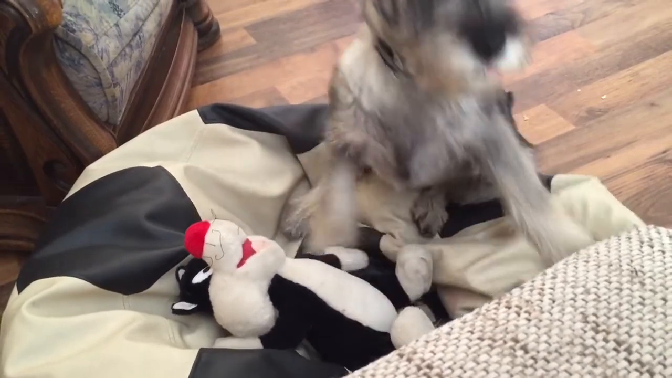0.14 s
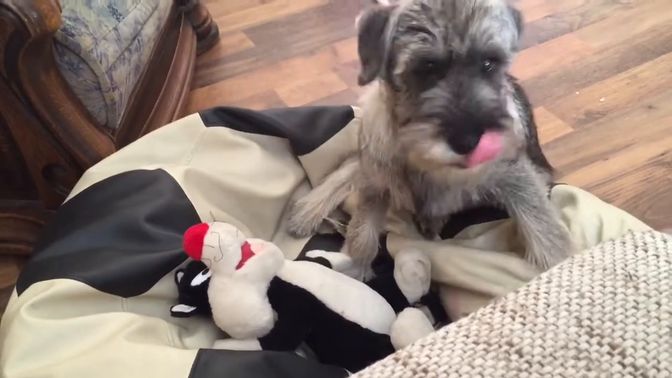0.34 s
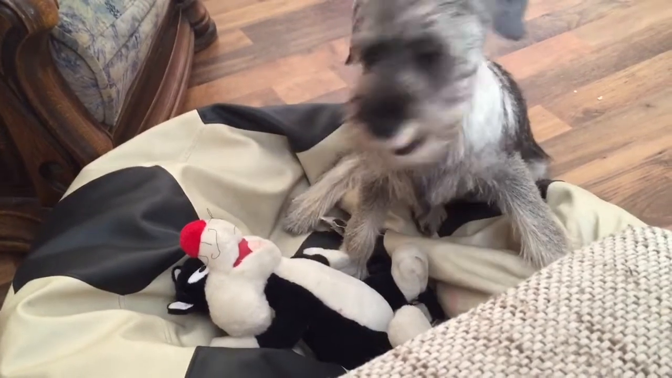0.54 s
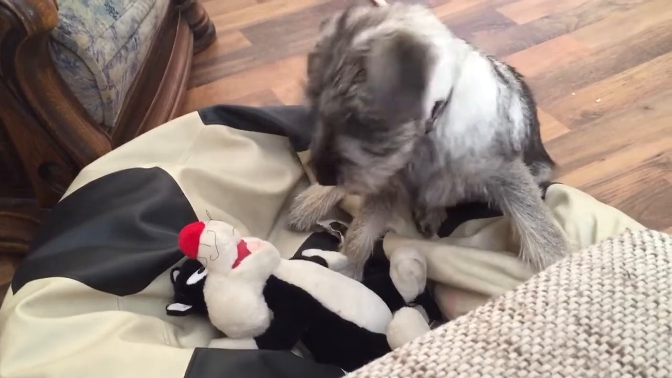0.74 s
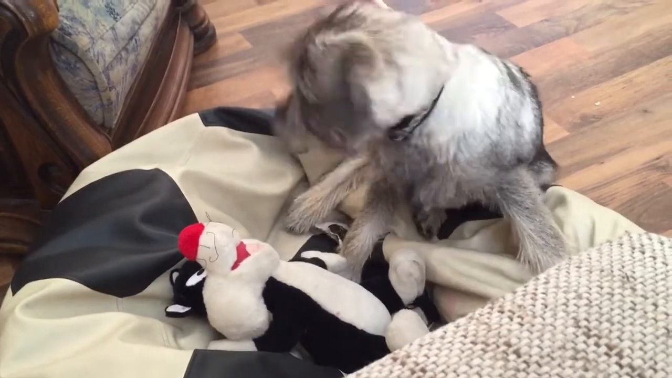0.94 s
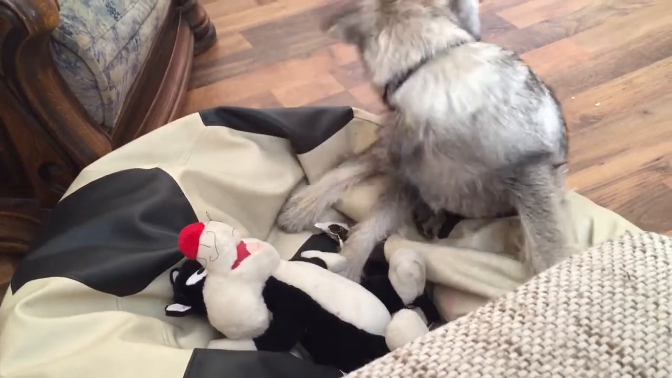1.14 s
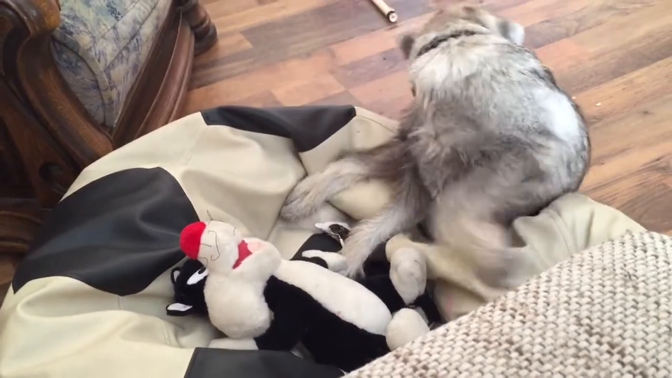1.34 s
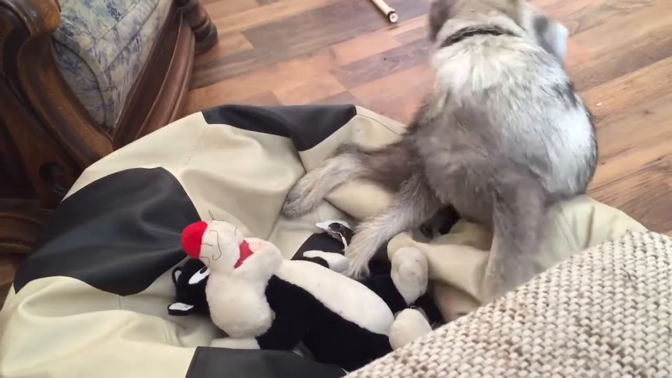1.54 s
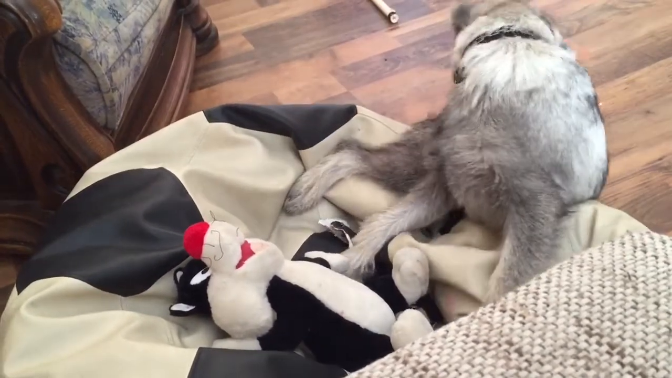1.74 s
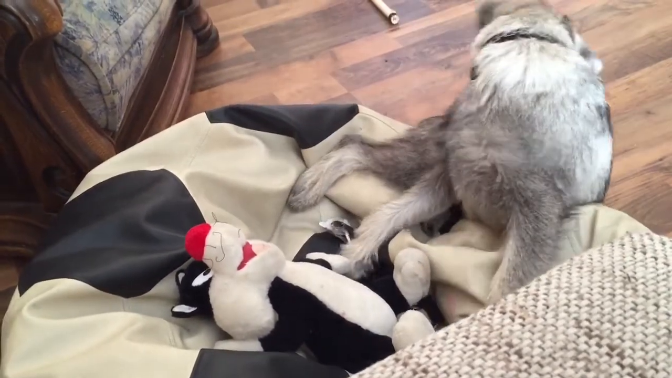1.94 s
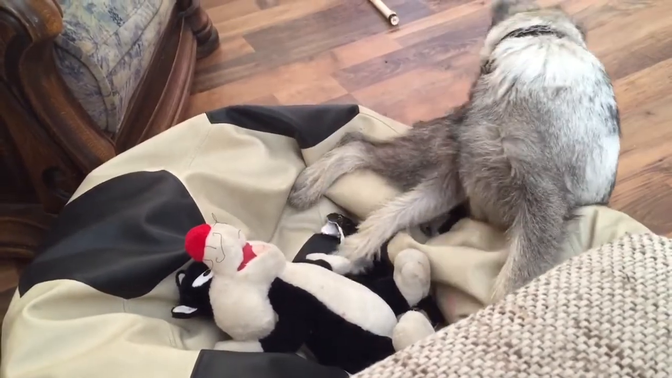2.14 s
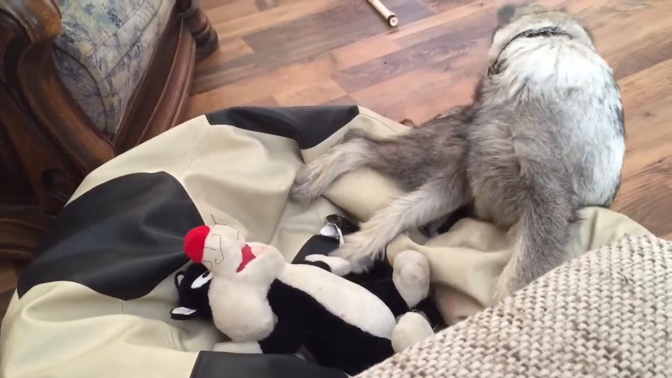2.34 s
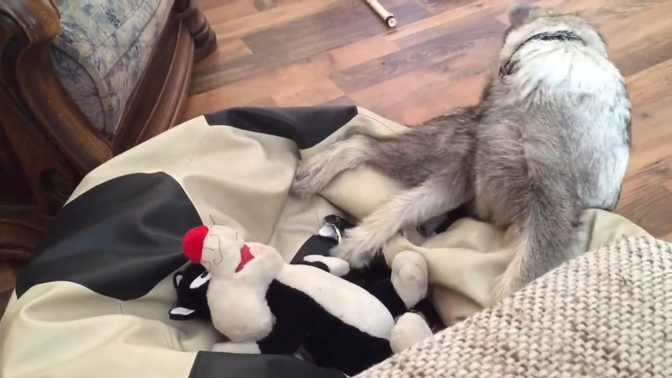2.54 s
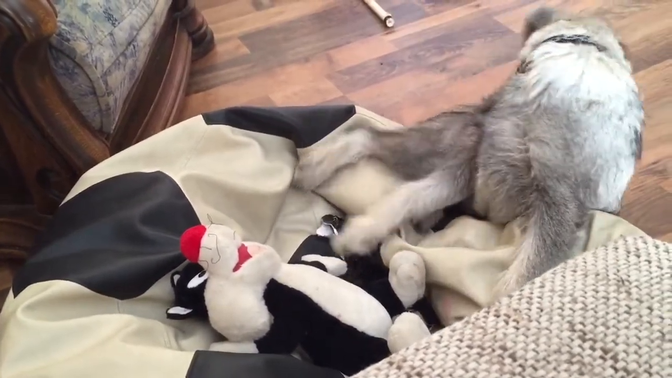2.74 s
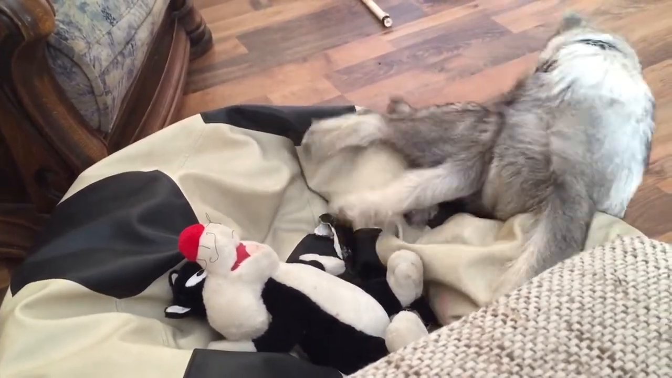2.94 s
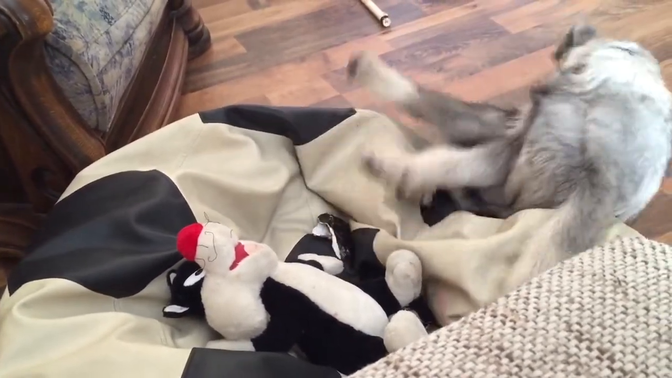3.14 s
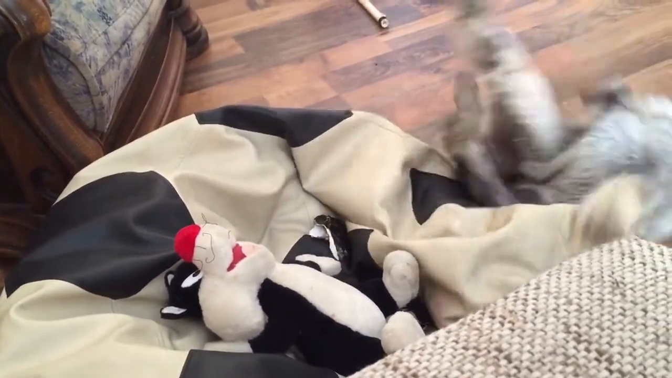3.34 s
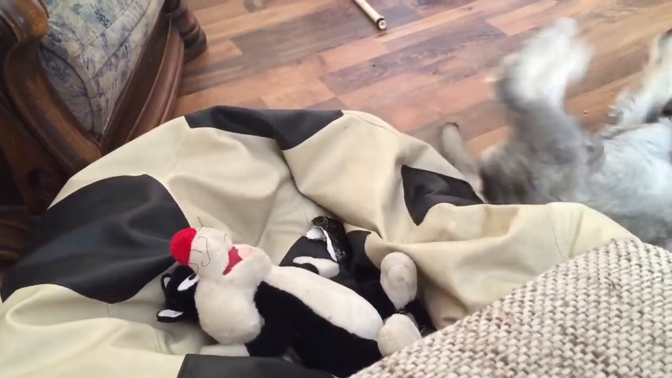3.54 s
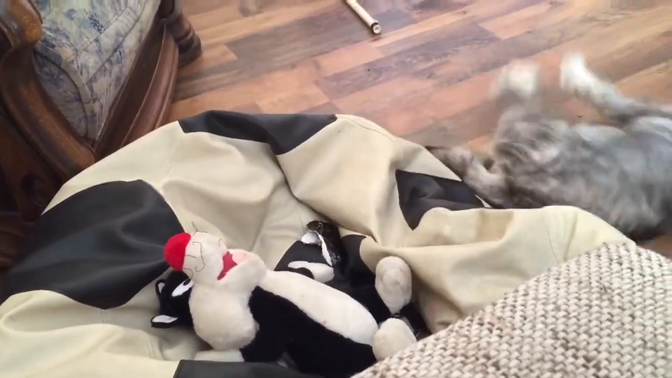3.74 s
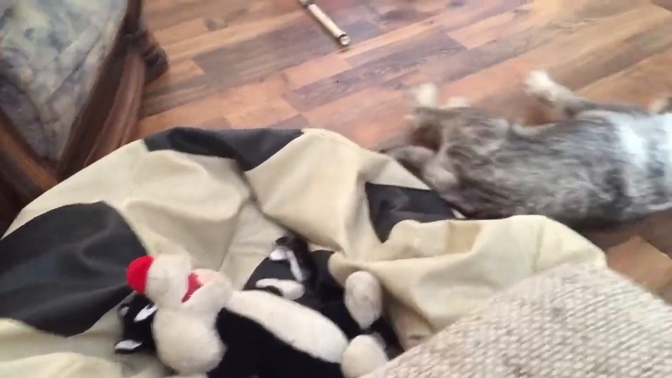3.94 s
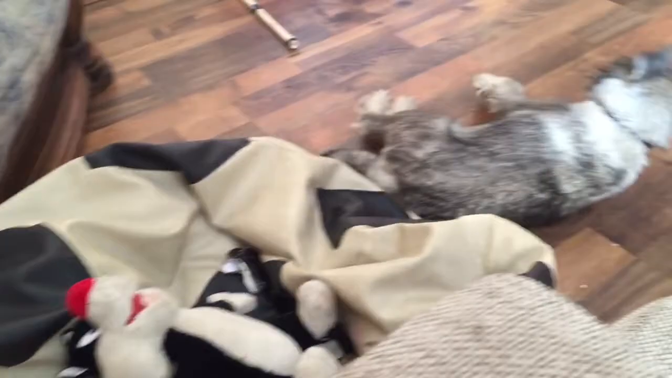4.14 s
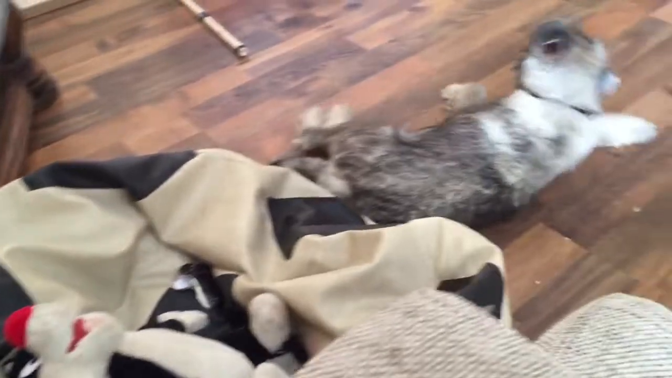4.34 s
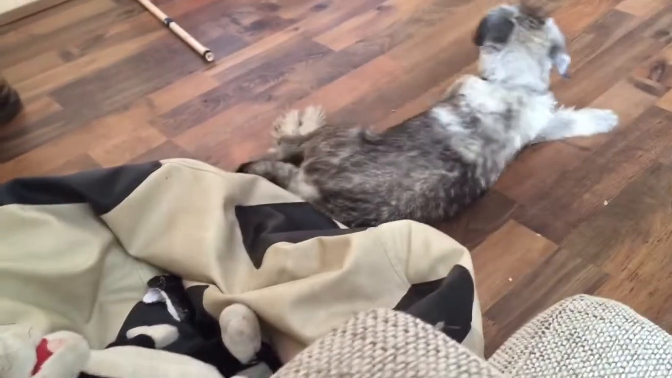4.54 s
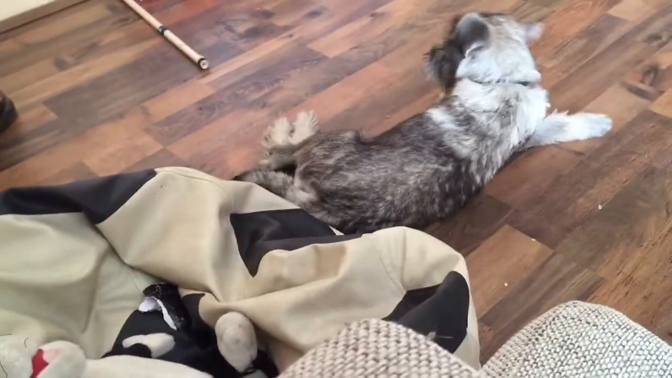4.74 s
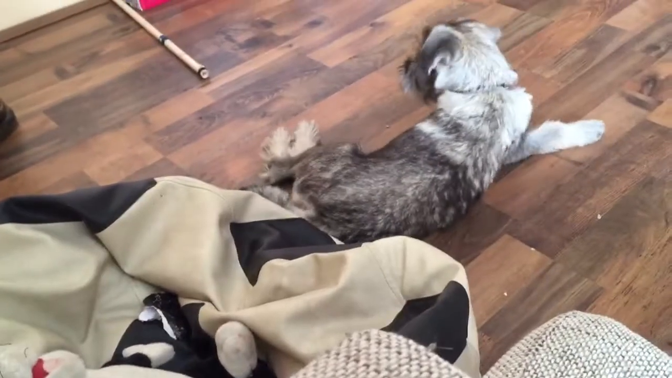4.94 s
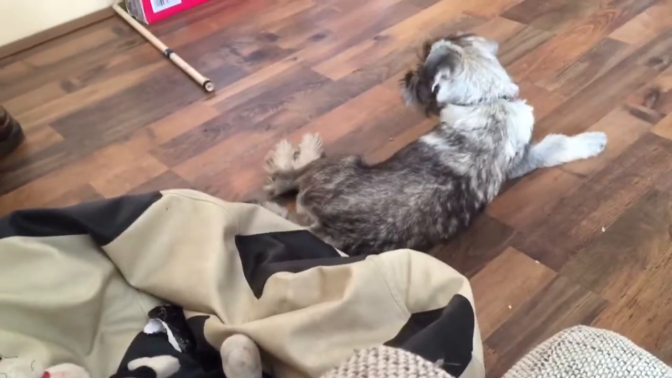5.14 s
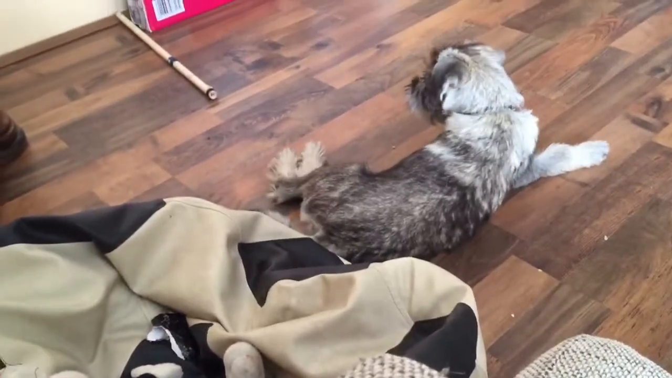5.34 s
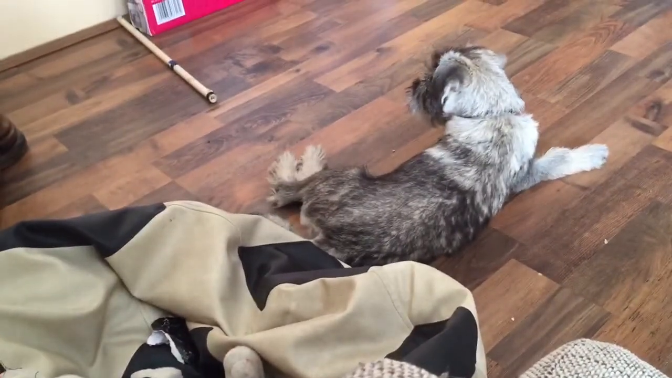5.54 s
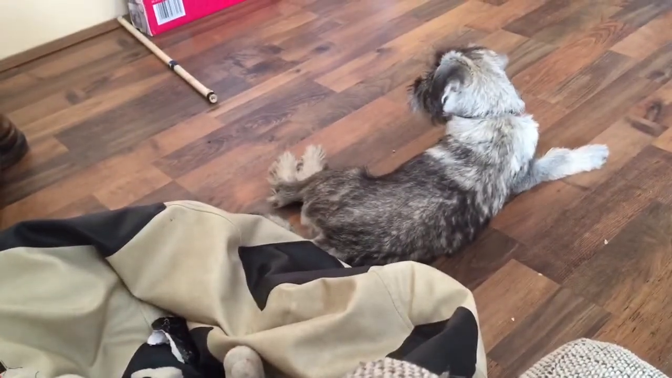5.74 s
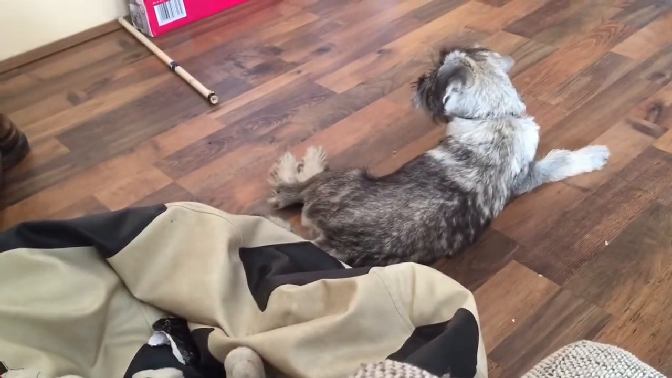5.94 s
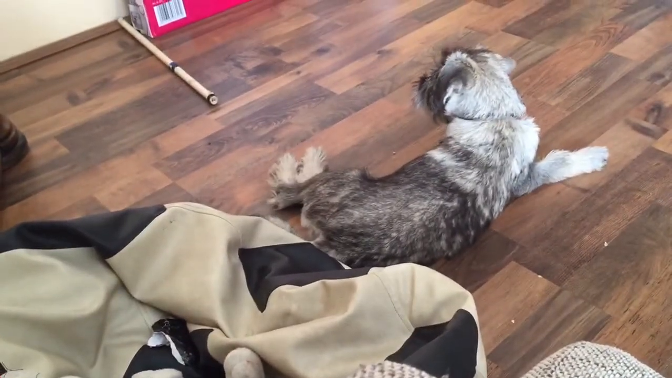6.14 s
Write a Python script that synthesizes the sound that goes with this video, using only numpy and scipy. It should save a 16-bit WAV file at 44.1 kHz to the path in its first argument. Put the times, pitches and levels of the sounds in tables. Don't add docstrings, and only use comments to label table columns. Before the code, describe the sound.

In a quiet living room, a small dog scrambles on a bean bag close to a small microphone. Two or three sharp stamps crunch the beads and slap the cover, then softer rustles and fur hiss follow, with one more strong stamp. It slides off and hits the wooden floor with two hollow knocks, the second louder. Collar tag ticks, a few beads trickle, then only faint room air and fridge hum remain.

```python
import sys
import numpy as np
from scipy import signal
from scipy.io import wavfile

SR = 44100
rng = np.random.default_rng(int(sys.argv[2]) if len(sys.argv) > 2 else 0)


def wav_record(signal):
    frames = np.transpose(np.atleast_2d(signal))
    bounded = np.clip(frames, -1, 1)
    quanta = np.round(bounded * 32767).astype(np.int16)
    wavfile.write(sys.argv[1], SR, quanta)


def gain_from_db(level_db):
    decades = np.asarray(level_db, float) / 20
    return 10 ** decades


N = 273331

# pitch_hz, width_hz, level_db
BAG_RESONANCES = [(105.5, 39, -6), (206, 40.7, -3), (286, 30, 1), (362, 32.7, 1), (444.6, 37, -1.5)]
# pitch_hz, level_db (per Hz)
CRUNCH_COLOUR = [(900, 2), (1200, -1), (1800, 1), (2800, -6.5), (3700, -12), (6000, -22), (12000, -33),
                 (16500, -51.5)]
# pitch_hz, level_db (per Hz)
HISS_COLOUR = [(2500, 0.5), (4000, -1.5), (6500, -5.5), (9000, -9.5), (10800, -14.5), (12500, -11.5),
               (15000, -12.5), (16500, -11)]
# pitch_hz, level_db (per Hz)
DRAG_COLOUR = [(380, -9.5), (460, -3.5), (700, 3), (1000, -4), (1300, -10.5)]
# start_s, push_db, crunch_db (re push), hiss_db (re push), weight_db
STAMPS = [(0.222, -39.5, -3, -32, -43), (0.233, -31.5, -9, -16, -42), (0.317, -36, -8.5, -4, -40.5),
          (0.35, -37.5, -13, -20, -65), (1.035, -60.5, -6, -14.5, -60), (1.207, -55, -14, -27, -55.5),
          (1.631, -30.5, -10, -14.5, -36), (2.071, -65, -23, -15, -71), (2.375, -65.5, -3, 0.5, -63),
          (2.597, -60, -2, -19, -60), (2.861, -45, -10, -19, -73), (3.065, -47, -7.5, -25, -70)]
# pitch_hz, level_db, t60_s
WEIGHT_MODES = [(60, -20, 0.35), (94, -10, 0.21), (133.4, -8, 0.29), (202.8, 0, 0.22)]
# full_s, hold_s, crunch_db, climb_s (last 20 dB), depth_db (bag body re crunch)
LEANS = [(0.0, 0.024, -56, .05, 1), (0.056, .15, -62.5, -1.3, 4), (0.361, 0.036, -56, 0.3, 9.5),
         (0.453, 0.046, -59, 0.5, 3.5), (0.546, 0.058, -62, .1, 4), (0.798, 0.031, -58.5, 0.12, 1.5),
         (0.853, 0.056, -63, -0.45, 2.5), (1.267, 0.15, -64.5, .1, 7.5), (1.378, .12, -54, 0.15, -6),
         (1.697, 0.026, -65, 1, 1), (2.052, 0.011, -66, 0.24, 8.5), (2.393, 0.025, -70.5, 0.7, -2),
         (2.607, 0.017, -67.5, 0.13, 2), (2.875, 0.085, -57, 0.16, -3.5), (3.268, 0.062, -55, 0.37, -2.5),
         (3.405, 0.12, -53, 0.24, -3.5), (3.744, 0.058, -56, 0.11, 6), (3.856, 0.051, -66, 0.56, 14.5),
         (4.22, 0.24, -82.5, -7, 5)]
# full_s, hold_s, hiss_db, climb_s (last 20 dB), drag_db (re hiss)
RUBS = [(.01, 0.032, -70, 4.5, 3.5), (.36, .04, -62, -0.06, -10), (.45, 0.05, -68, 0.5, 7),
        (0.77, 0.15, -75, 0.19, 14.5), (1.505, .01, -68, 0.5, 3), (2.095, .03, -76, 1.8, -1.5),
        (2.23, .02, -76, .1, 5.5), (2.40, .01, -73.5, -0.4, -6), (2.603, 0.0092, -74, .1, -3),
        (2.873, 0.041, -63, 0.11, -3), (3.114, .01, -75, 1.2, -4), (3.426, 0.022, -68.5, 0.28, 9.5),
        (3.713, 0.037, -74.5, 0.5, 8), (3.944, 0.019, -71.5, 1.4, 14.5), (4.2, 0.28, -79.5, 1.3, -2.5)]
# full_s, hold_s, level_db, climb_s (last 20 dB)
FIDGET = (0.0, 4, -74, .1)
# full_s, hold_s, level_db, climb_s (last 20 dB)
TRICKLE = (3.6, 1.0, -82, .9)
# start_s, level_db (rms), low_hz, high_hz, length_s
SNAPS = [(0.2245, -44, 300, 3000, .005), (0.2385, -47, 2500, 7000, .007), (0.3213, -40, 800, 3000, .003),
         (0.3215, -47, 3000, 15000, .004), (0.578, -68, 4000, 13000, .004), (2.09, -74, 5000, 10000, .03),
         (.443, -67, 12000, 15300, .014), (.477, -66, 11000, 15300, .012), (3.548, -56, 2400, 4900, .03),
         (3.9022, -57, 2800, 9500, .004), (3.549, -66, 4900, 8500, .008), (3.95, -65, 2500, 6200, .022),
         (3.985, -70, 3400, 4500, .03), (4.39, -75, 3000, 15000, .022)]
# start_s, peak_db, pitch_hz, width_hz
SLAPS = [
    (0.2335, -31, 230, 160),
    (0.3218, -29, 520, 600),
]
# start_s, peak_db, knock_hz, width_hz, crack_db (rms)
LANDINGS = [
    (3.509, -42, 750, 500, -70),
    (3.5213, -21.5, 720, 340, -56),
    (3.7153, -17.8, 770, 170, -40),
]
# pitch_hz, level_db, t60_s
HIP_MODES = [(93.6, -39.5, 0.16), (124.1, -35.5, 0.13), (165.2, -39.5, 0.257), (212.6, -34, 0.31),
             (308, -37, 0.1), (403, -39, 0.11), (647, -45, 0.332)]
# pitch_hz, level_db, t60_s
SHOULDER_MODES = [(215, -41, .35), (312, -41, .2), (533, -44, .45), (565, -44, .45), (655, -40, .55),
                  (684, -38, .55), (781, -43, .35), (948, -41, .36), (1095, -42, .32), (1250, -47, .35),
                  (1690, -47, .33), (2400, -50, .45), (1450, -51, .25), (3200, -51, .28)]
# delay_s, level_db
ECHOES = [(.0092, 1), (.0163, -7), (.033, -5), (.049, -4), (.059, -7)]
# full_s, hold_s, level_db, climb_s (last 20 dB)
SWAYS = [
    (3.51, .15, -54, -0.57),
    (3.87, 0.037, -56.5, 0.07),
]
# start_s, peak_db, ring_hz (main ring)
TAG_TICKS = [(3.6132, -56, 3630), (3.902, -49, 3180), (3.9062, -43, 4220), (3.914, -48, 3220),
             (3.9542, -43, 3960), (3.958, -46, 4070), (3.962, -48, 3770)]
# ratio (multiple of main ring), level_db, t60_s
TAG_MODES = [(1.0, -4, .022), (1.06, -8, .018), (1.36, -14, .012), (.78, -12, .014)]
# pitch_hz, level_db (rms)
HUM = [(96.8, -77), (198.6, -78), (173, -86), (294, -91.5)]
# pitch_hz, level_db (per Hz)
AIR_COLOUR = [(20, -33), (45, -4.5), (200, -6.5), (400, -15.5), (1000, -18.5), (4000, -24), (10000, -28),
              (16500, -33.5)]
# pitch_hz, t60_s
ROOM_T60 = [(100, 0.12), (600, 0.6), (2000, 0.15), (6000, 0.25), (14000, 0.1514)]

LEAN_RELEASE_DB_PER_S, RUB_RELEASE_DB_PER_S, FIDGET_FADE_DB_PER_S = 170.5, 195, 35
DRAG_RE_CRUNCH_DB, DRAG_SHARE_OF_DEPTH = -4, 0.45
FIDGET_BODY_DB, FIDGET_DRAG_DB, FIDGET_HISS_DB = -1, -8, -11.5
SETTLE_T60_S = 0.31
SENT_DB = -8
SENT_LOSS_DB = 5
SWAY_HZ, SWAY_LOADED_HZ, SWAY_RELAX_S, SWAY_FADE_DB_PER_S = 41.0, 46.9, .04, 150
BOARD_RING_S = .05
BOARD_RING_CYCLES = 55
ROLL_DB, BLOW_DB = -2.5, -1
HUM_WANDER_RAD, AIR_DB = 1.2, -71.5
MIC_NOTCH_HZ, MIC_NOTCH_SHARE = 10400, .45


def rms_one(x):
    return x / np.sqrt(np.mean(x ** 2) + 1e-20)


def at_hz(points, hz):
    table = np.array(points)
    return np.interp(np.log(hz), np.log(table[:, 0]), table[:, 1])


def band_pass(x, low_hz, high_hz, order=2):
    return signal.sosfilt(signal.butter(order, [low_hz, high_hz], "band", fs=SR, output="sos"), x)


def drift(rate):
    r = np.exp(-80 * np.pi * rate / SR)
    noise = rng.standard_normal(N // 40 + 2002)
    slow = signal.lfilter([1], [1, -2 * r, r * r], noise)[2000:]
    return np.interp(np.arange(N) / 40, np.arange(len(slow)), rms_one(slow))


def ring(clicks, hz, t60):
    r = gain_from_db(-60 / (t60 * SR))
    w = 2 * np.pi * min(hz, .45 * SR) / SR
    return signal.lfilter([0, np.sin(w)], [1, -2 * r * np.cos(w), r * r], clicks + 1e-18)


def click(s, db):
    out = np.zeros(N)
    out[round(s * SR)] = gain_from_db(db)
    return out


def knock(s, db, hz, width):
    t60 = np.log(1000) / (np.pi * width)
    once = ring(click(s, 0), hz, t60)
    twice = -ring(once, hz, t60 / 2)
    return gain_from_db(db) * twice / np.abs(twice).max()


def puff(s, db, low_hz, high_hz, length):
    out, t, at = np.zeros(N), np.arange(4000) / SR, round(s * SR)
    noise = band_pass(rng.standard_normal(4000), low_hz, high_hz, order=4)
    shape = np.minimum(t / .0008, 1) * np.exp(-(t / length) ** 2)
    out[at:at + 4000] = gain_from_db(db) * rms_one(noise) * shape
    return out


def grains(per_s, spread_db):
    sizes = gain_from_db(spread_db * np.minimum(rng.exponential(1, N), 5)) * rng.choice([-1, 1], N)
    return rms_one(sizes * (rng.random(N) < per_s / SR))


def coloured(sources, spectrum, patchy_db):
    low_hz, top_hz = spectrum[0][0], min(spectrum[-1][0], .4 * SR)
    edges = np.geomspace(low_hz, top_hz, round(3 * np.log2(top_hz / low_hz)) + 1)
    out, together = 0, drift(11)
    for k, (low, high) in enumerate(zip(edges, edges[1:])):
        band = band_pass(sources[k % 2], low, high)
        flicker_db = patchy_db * (1.12 * together + drift(8.84))
        out = out + band * gain_from_db(at_hz(spectrum, np.sqrt(low * high)) + flicker_db)
    return rms_one(out)


def swells(rows, release_db_per_s):
    t, power = np.arange(0, N + 32, 32) / SR, 0
    for s, hold, db, climb in rows:
        early = np.maximum(s - t, 0)
        late = np.maximum(t - s - max(hold, 0), 0)
        power = power + gain_from_db(db - 20 * early / max(climb, .01) - release_db_per_s * late) ** 2
    return np.interp(np.arange(N) / SR, t, power)


def bean_bag():
    slips = [grains(3000, 2.07), grains(3000, 2.7)]
    body = rms_one(bag_body(grains(1200, 2.8)))
    drag = coloured(slips, DRAG_COLOUR, patchy_db=.7)
    crunch = coloured(slips, CRUNCH_COLOUR, patchy_db=.9)
    hiss = coloured([grains(12000, 2.5), grains(12000, 2.5)], HISS_COLOUR, patchy_db=.5)
    trickle = coloured(slips, [(7000, -4), (8500, 0), (10200, -3)], patchy_db=.5)

    rubbing = swells([row[:4] for row in RUBS], RUB_RELEASE_DB_PER_S)
    rubbing = rubbing + gain_from_db(FIDGET_HISS_DB) ** 2 * swells([FIDGET], FIDGET_FADE_DB_PER_S)
    drag_rows = [(s, hold, db + drag_db, climb) for s, hold, db, climb, drag_db in RUBS]
    dragging = swells(drag_rows, RUB_RELEASE_DB_PER_S)
    dragging = dragging + leaning(DRAG_RE_CRUNCH_DB, DRAG_SHARE_OF_DEPTH, FIDGET_DRAG_DB)

    out = body * np.sqrt(leaning(0, 0.72, FIDGET_BODY_DB) + gain_from_db(-10) ** 2 * stamp_swell(1, pace=0.91))
    out += drag * np.sqrt(dragging + gain_from_db(-5.5) ** 2 * stamp_swell(2, pace=0.97))
    out += crunch * np.sqrt(leaning(0, 0, 0) + gain_from_db(-4.5) ** 2 * stamp_swell(2, pace=1.63))
    out += hiss * np.sqrt(rubbing + gain_from_db(-8) ** 2 * stamp_swell(3, pace=1.0))
    out += trickle * np.sqrt(swells([TRICKLE], 45))
    return out + paw_weight()


def bag_body(drive):
    out = 0
    for k, (hz, width, db) in enumerate(BAG_RESONANCES):
        t60 = np.log(1000) / (np.pi * width)
        out = out + (-1) ** k * gain_from_db(db) * np.sqrt(width) * ring(drive, hz, t60)
    return out


def leaning(offset_db, depth_share, fidget_db):
    rows = [(s, hold, db + offset_db + depth_share * depth, climb) for s, hold, db, climb, depth in LEANS]
    fidgeting = gain_from_db(fidget_db) ** 2 * swells([FIDGET], FIDGET_FADE_DB_PER_S)
    return swells(rows, LEAN_RELEASE_DB_PER_S) + fidgeting


def stamp_swell(column, pace):
    power = np.zeros(N)
    after = np.arange(SR) / SR
    rise = 1 - np.exp(-after / 0.0043)
    for row in STAMPS:
        at = round(row[0] * SR)
        db = row[1] + (row[column] if column > 1 else 0)
        power[at:at + SR] += (rise * gain_from_db(db - 60 * after / (SETTLE_T60_S * pace))) ** 2
    return power


def paw_weight():
    hits = sum(click(row[0], row[4]) for row in STAMPS)
    pushes = signal.oaconvolve(hits, signal.windows.hann(170) / 85)[:N]
    return sum((-1) ** k * gain_from_db(db) * ring(pushes, hz, t60) for k, (hz, db, t60) in enumerate(WEIGHT_MODES))


def snaps():
    return sum(puff(*row) for row in SNAPS) + sum(knock(*row) for row in SLAPS)


def landings():
    knocks, cracks, sent = 0, 0, 0
    for s, db, hz, width, crack_db in LANDINGS:
        knocks = knocks + knock(s, db, hz, width)
        cracks = cracks + puff(s - .0012, crack_db, 900, 3900, .008)
        sent_db = db + SENT_DB - SENT_LOSS_DB * np.log2(width / 170)
        sent = sent + knock(s, sent_db, .92 * hz, 1.6 * width)
    echoes = sum(gain_from_db(db) * np.roll(sent, round(delay * SR)) for delay, db in ECHOES)
    wood = boards()
    to_room = gain_from_db(3) * sent + gain_from_db(-7.0) * cracks + gain_from_db(-13.5) * wood
    return knocks + cracks + echoes + wood, to_room


def boards():
    out, t = np.zeros(N), np.arange(SR) / SR
    for (s, *rest), modes in zip(LANDINGS[1:], (HIP_MODES, SHOULDER_MODES)):
        for hz, db, t60 in modes:
            at = round((s + 0.1232 / np.sqrt(hz)) * SR)
            damped = min(BOARD_RING_S, BOARD_RING_CYCLES / hz)
            even_out = np.sqrt(2 * np.log(1000) / (damped * SR))
            feed = rng.standard_normal(SR) * gain_from_db(ROLL_DB - 60 * t / t60) * even_out
            blow = signal.windows.hann(round(.45 * SR / hz) + 3)
            feed[:len(blow)] += gain_from_db(BLOW_DB) * blow * hz / (.15 * SR)
            out[at:at + SR] += gain_from_db(db) * ring(feed, hz, damped)
    return out


def joists():
    after = np.maximum(np.arange(N) / SR - SWAYS[0][0], 0)
    hz = SWAY_HZ + (SWAY_LOADED_HZ - SWAY_HZ) * np.exp(-after / SWAY_RELAX_S)
    strength = np.sqrt(2 * swells(SWAYS, SWAY_FADE_DB_PER_S))
    return strength * np.sin(2 * np.pi * np.cumsum(hz) / SR)


def collar_tag():
    out = 0
    luck_db = rng.normal(0, 1.4, (len(TAG_TICKS), len(TAG_MODES)))
    for (s, db, hz), row in zip(TAG_TICKS, luck_db):
        for (ratio, mode_db, t60), luck in zip(TAG_MODES, row):
            out = out + ring(click(s, db + mode_db + luck), hz * ratio, t60)
    return band_pass(out, 2600, 6500)


def room(x):
    t = np.arange(SR) / SR
    tail, edges = 0, 40 * 2 ** np.arange(0, 9.1)
    for low, high in zip(edges, edges[1:]):
        band = band_pass(rng.standard_normal(SR), low, high)
        tail = tail + band * gain_from_db(-60 * t / at_hz(ROOM_T60, np.sqrt(low * high)))
    tail = tail * np.clip((t - .006) / 0.015, 0, 1)
    return signal.fftconvolve(x, tail / np.sqrt(np.sum(tail ** 2)))[:N]


def background():
    t, hum = np.arange(N) / SR, 0
    for hz, db in HUM:
        strength = np.sqrt(2) * gain_from_db(db + 2.9 * drift(3.0))
        hum = hum + strength * np.sin(2 * np.pi * hz * t + HUM_WANDER_RAD * drift(5.0))
    air = coloured(rng.standard_normal((2, N)), AIR_COLOUR, patchy_db=0.62)
    return hum + gain_from_db(AIR_DB) * air


def scene():
    bag = bean_bag()
    fall, fall_sent = landings()
    small = collar_tag() + snaps()
    wet = room(gain_from_db(-18) * bag + fall_sent + gain_from_db(-15) * small)
    return (bag + fall + small + wet + joists() + background())[None]


def band_limit(x):
    return signal.sosfilt(signal.butter(12, 15630, fs=SR, output="sos"), x)


def record(dry):
    x = signal.sosfilt(signal.butter(3, 30, "high", fs=SR, output="sos"), dry)
    x = x - MIC_NOTCH_SHARE * signal.lfilter(*signal.iirpeak(MIC_NOTCH_HZ, 14, fs=SR), x)
    x = signal.sosfilt(signal.cheby2(20, 50, 15580, fs=SR, output="sos"), x)
    return band_limit(x)


dry = scene()
out = record(dry)
wav_record(out)
```